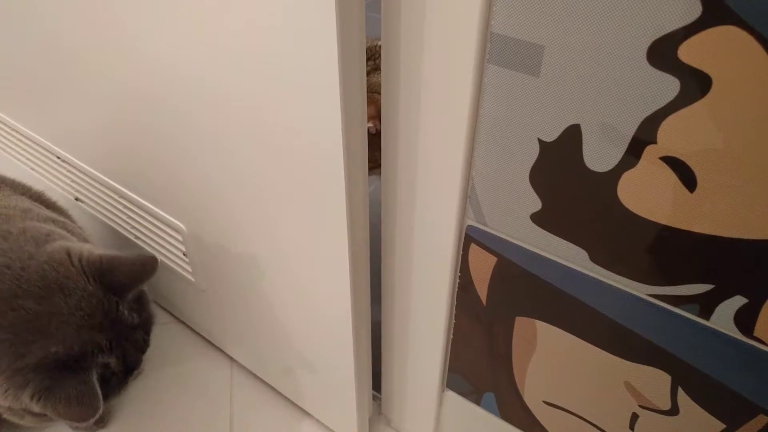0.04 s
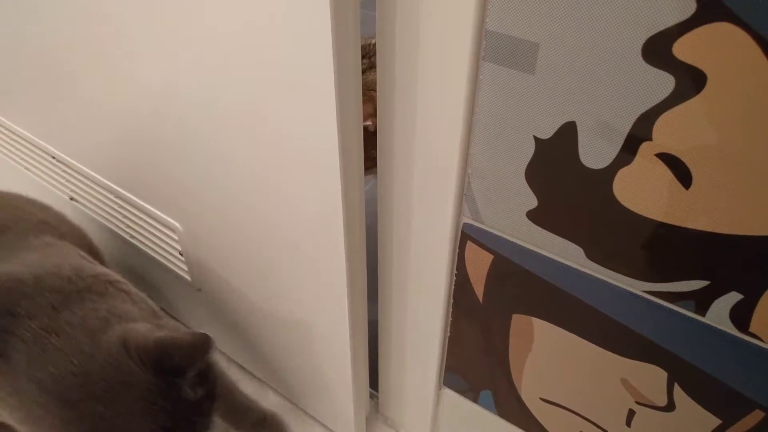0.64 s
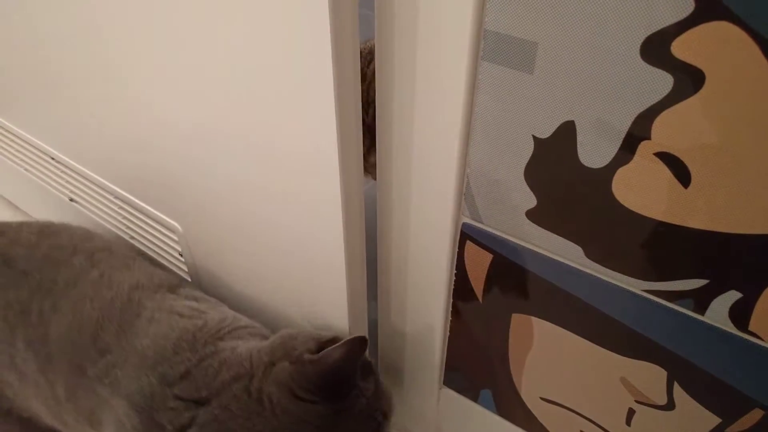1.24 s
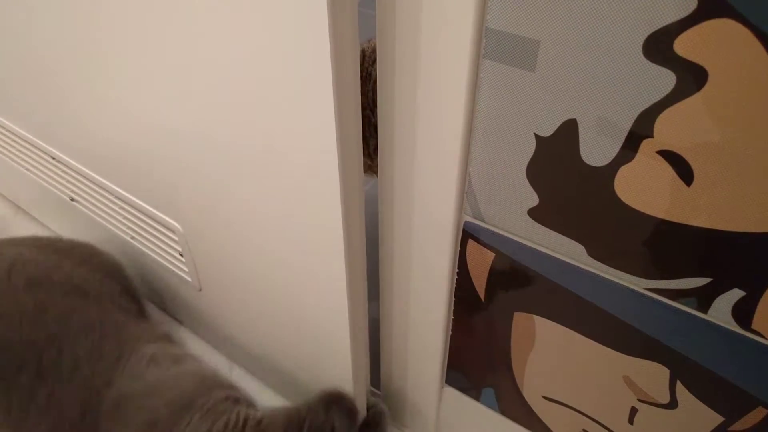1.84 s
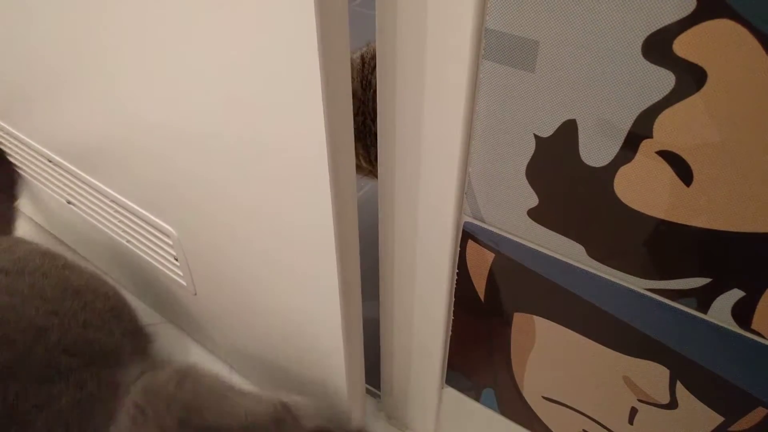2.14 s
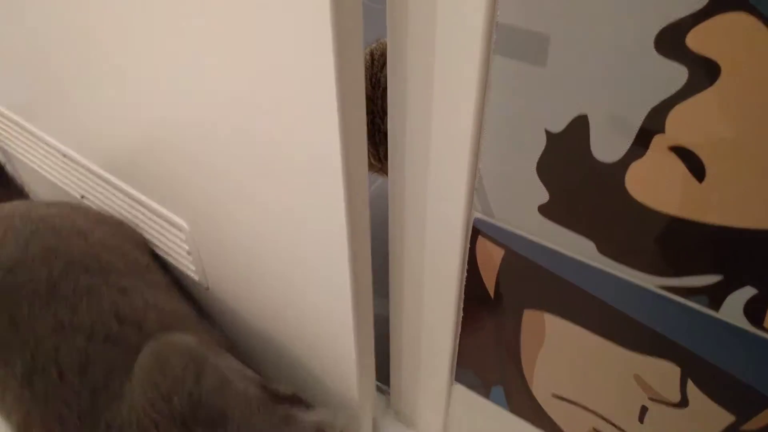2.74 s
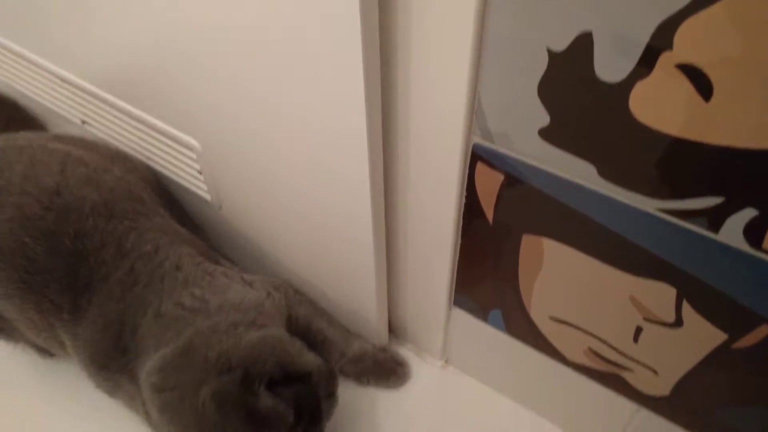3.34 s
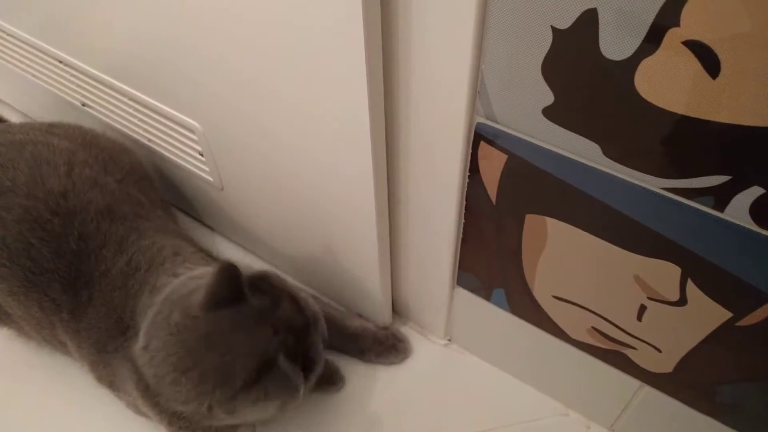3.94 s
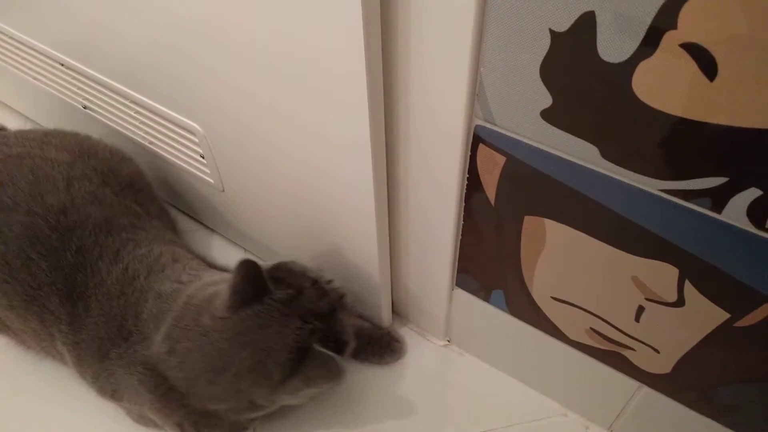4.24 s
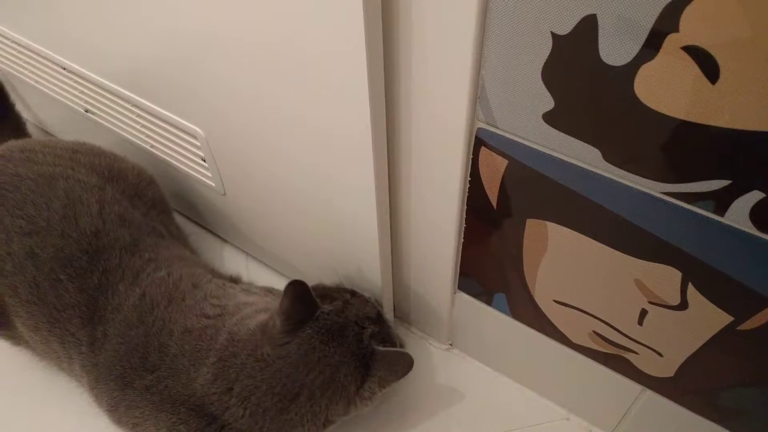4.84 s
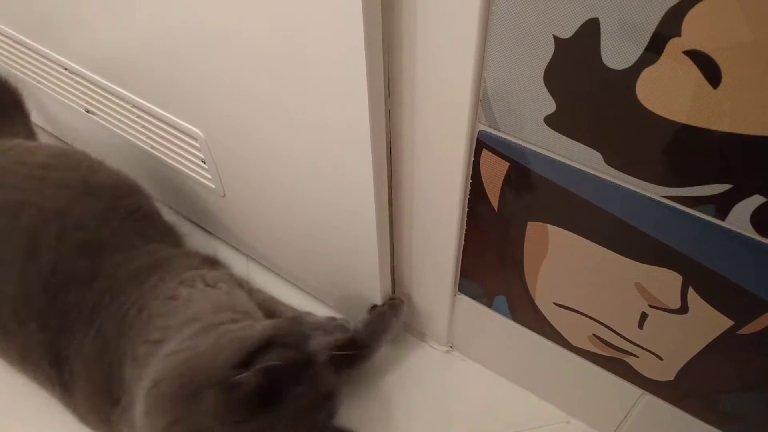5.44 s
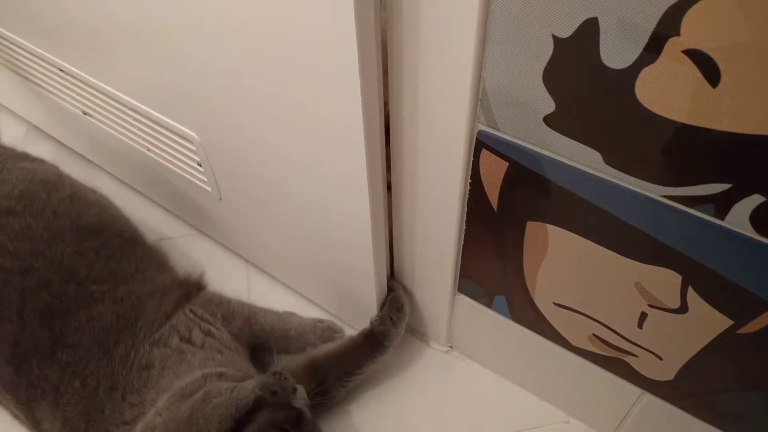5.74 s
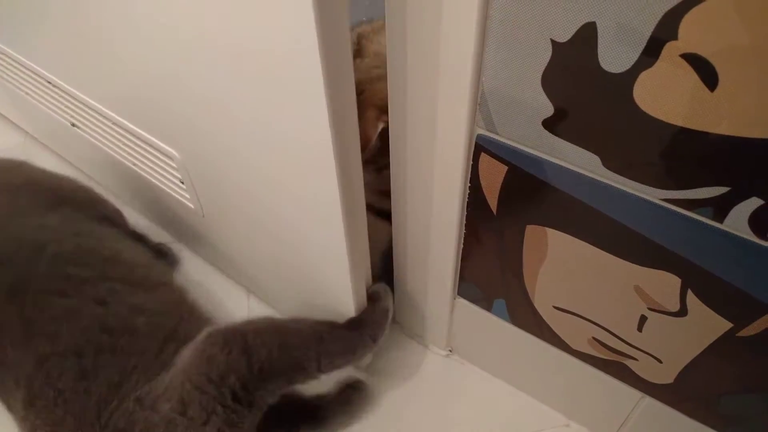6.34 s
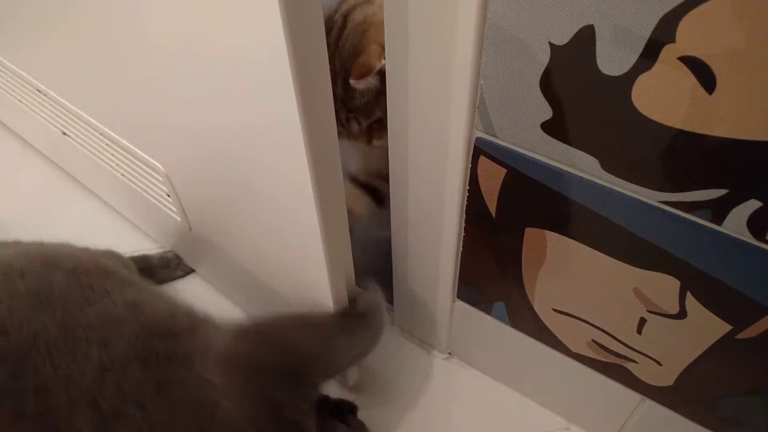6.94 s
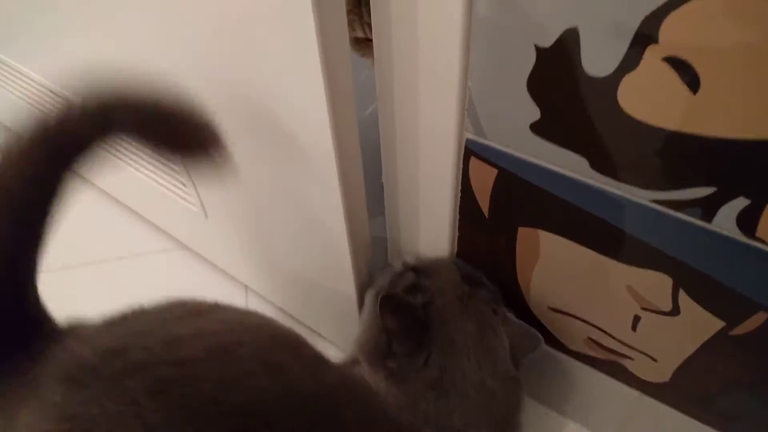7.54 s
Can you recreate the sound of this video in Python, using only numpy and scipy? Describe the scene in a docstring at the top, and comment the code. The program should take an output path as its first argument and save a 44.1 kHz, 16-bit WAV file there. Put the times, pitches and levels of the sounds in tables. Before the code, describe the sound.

A cat's fur and paws brush faintly against a light door and the floor, with a few tiny clicks and soft bumps. Fingers tap briefly on the microphone. After a lull the cat works harder: claws catch and snap off the door edge, the panel booms and clatters, and the door frame takes a few dry knocks. The hand-held microphone is close, in a small tiled room with a faint electrical hum.

```python
"""Faint brushing comes first: a cat's fur and pads rub a light door and the floor as it paws at the gap.
From about 5 s it works harder: claws catch on the edge and snap off, the panel booms and clatters,
and the frame takes a few knocks. Small tiled room, hand-held phone microphone close to the door.
Fingers tap the phone's case now and then; a faint mains hum and room air lie under it all."""
import sys
import numpy as np
from scipy import signal
from scipy.fft import rfft, irfft
from scipy.io import wavfile
from scipy.ndimage import uniform_filter1d

SR = 44100
rng = np.random.default_rng(int(sys.argv[2]) if len(sys.argv) > 2 else 0)


def transcribe(u):
    """Save the signal u as a 16-bit wav file named by the first command-line argument.

    u: samples, shape (n,) or (channels, n), limited to [-1, 1]; the rate is SR.
    q: integer samples, one column per channel.
    """
    v = np.clip(np.atleast_2d(u).T, -1, 1)
    q = np.round(v * 32767).astype(np.int16)
    wavfile.write(sys.argv[1], SR, q)


N = 339300
T = np.arange(N) / SR

# spectrum of rubbed or rattled wood: f/Hz, relative level/dB
WOOD_SPECTRUM = [(60, -8.5), (200, -0.5), (400, 1.5), (900, 1), (1900, 4.5), (4000, -12.5), (16000, -107)]


def undb(db):
    """Decibels to gain."""
    return 10 ** (np.asarray(db) / 20)


def unit(x):
    """Scale to rms 1."""
    return x / np.sqrt(np.mean(x ** 2))


def add(out, s, x):
    """Mix x into out from time s."""
    i = max(int(s * SR), 0)
    out[i:i + len(x)] += x[:max(N - i, 0)]


def colour(x, points):
    """Minimum-phase filter following an outline of f/Hz, level/dB."""
    size = 4096
    hz, db = np.transpose(points)
    bin_hz = np.arange(size // 2 + 1) * SR / size
    log_gain = np.interp(np.log(bin_hz + 1), np.log(hz), np.log(undb(db)))
    cepstrum = irfft(log_gain)[:size // 2]
    cepstrum[1:] *= 2
    return signal.fftconvolve(x, irfft(np.exp(rfft(cepstrum, size))))[:len(x)]


def resonate(x, hz, q):
    """One resonance, gain 1 at its centre."""
    return signal.lfilter(*signal.iirpeak(min(hz, SR / 3), max(q, 1), fs=SR), x)


def decay(t, t60):
    """Envelope that falls 60 dB in t60 seconds."""
    return np.exp(-np.log(1000) * t / t60)


def wander(rate_hz):
    """Random drift with a spread near 1."""
    knots = rng.standard_normal(N // 20)
    return np.interp(T * rate_hz, np.arange(len(knots)), knots)


def claws(slip_s=0.0013, second_slip=0.24, release=1.6, clean_hz=11900, skidding_hz=8450):
    """A claw lets go with a jerk and skids in two quick slips; returns direct sound and room feed."""
    # claws leaving the edge: t/s, level/dB, ring f/Hz, skid/s, room feed relative to the snap/dB
    releases = [(1.609, -50, 7000, .002, -10), (1.699, -50, 6770, 0.0086, -5.5),
                (5.334, -47.5, 4800, .002, 3), (5.5217, -32.5, 7800, 0.0014, -7),
                (5.527, -39, 4100, 0.013, -6.5), (5.6494, -17, 7550, 0.001, -7.5),
                (5.914, -43.5, 5450, .012, -1), (6.021, -45, 4200, 0.00098, -3),
                (6.298, -22, 4120, .0019, -11), (6.3062, -30.5, 4070, 0.0035, -21),
                (6.570, -22.5, 5700, .003, -3), (6.6977, -33, 3200, 0.0017, -20),
                (6.8906, -30, 5370, 0.0019, 1), (6.909, -40, 3140, 0.01, -10),
                (6.966, -30.5, 3500, 0.0014, -19), (7.225, -39, 3540, 0.0017, -28),
                (7.384, -43.5, 8100, .0016, -9)]
    direct, spill = np.zeros(N), np.zeros(N)
    t = T[:SR // 10]
    jerk = signal.unit_impulse(len(t))
    for s, db, hz, skid_s, room_db in releases:
        drag = skid_s / 0.0019  # above 1 the snap is duller and rings more on one resonance
        ring_db = np.log2(drag) - 1
        top_hz = skidding_hz + (clean_hz - skidding_hz) / (1 + drag ** 6)
        skid = np.exp(-t / skid_s) + second_slip * (t > slip_s) * np.exp(-abs(t - slip_s) / skid_s)
        force = release * jerk + skid * rng.standard_normal(len(t))
        snap = door_edge(force, hz, ring_db, top_hz)
        gain = undb(db) / np.sqrt(uniform_filter1d(snap ** 2, size=176).max())  # by the loudest 4 ms
        add(direct, s, gain * snap)
        # summed over all directions, the spectrum that feeds the room is smooth
        add(spill, s, gain * undb(room_db) * door_edge(jerk, hz, ring_db, top_hz))
    return direct, spill


def door_edge(force, hz, ring_db, top_hz):
    """A claw rings the edge; where it lands picks out one resonance and leaves far lower ones quiet."""
    # spectrum of a claw on the edge: f/Hz, relative level/dB
    claw_spectrum = [(200, -11), (1150, -15), (1800, -1), (2400, -4), (3200, -4.5), (5500, -3.5),
                     (7500, -3.5), (9500, -7.5), (12000, -5), (16000, -4)]
    # resonances of the edge: f/Hz, width/Hz, relative level/dB
    edge_modes = [(1940, 220, -5), (3250, 340, -1.5), (4160, 520, -5), (6100, 860, -12), (6700, 260, 1.5),
                  (7420, 220, 1), (12000, 760, -11)]
    low_hz = 0.42 * hz
    contact_band = [(low_hz * 2 ** -.5, -16), (low_hz, 0), (top_hz, 0), (top_hz * 2 ** .5, -13)]
    crack = colour(colour(force, claw_spectrum), contact_band)
    crack = crack + sum(undb(db) * resonate(crack, f, f / width) for f, width, db in edge_modes)
    return unit(unit(crack) + undb(ring_db) * unit(resonate(crack, hz, q=3.3)))


def door_panel(clatter_hz=1500, clatter_rise_s=0.0042, clatter_fade_s=0.02, linger_s=0.11, ring_db=-6):
    """A soft push sets the low modes booming; the edge chatters under the paw and rings higher ones."""
    # shoves on the door: t/s, boom peak/dB, push f/Hz, clatter level/dB
    shoves = [(1.914, -51.5, 71.5, -68), (2.97, -51.5, 65, -82), (5.388, -42, 86, -60),
              (5.463, -51, 75, -62.5), (5.535, -26, 95, -43.5), (5.609, -39.5, 130, -63.5),
              (5.763, -60, 113, -53.5), (6.12, -51, 66, -74), (6.30, -34.5, 78, -51),
              (6.411, -38.5, 72, -69), (6.584, -43.5, 83, -43.5), (6.794, -36.5, 112, -81),
              (7.029, -46, 71, -68), (7.355, -45, 76.5, -66), (7.486, -54, 64, -72), (7.56, -57, 81, -57)]
    # modes of the panel: f/Hz, relative level/dB, t60/s
    panel_modes = [(68.17, 7.5, 0.78), (113.3, 10.5, 0.63), (182.5, -15.5, 0.31), (221.4, -11, 0.28),
                   (307, -27, 0.2), (401, -10, 0.42), (606, -22.5, 0.46), (784, -18, 0.32),
                   (940, -22, 0.13), (1140, -33, 0.16), (1356, -2, 0.03)]
    out, t = np.zeros(N), T[:SR]
    modes = [undb(db) * np.sin(2 * np.pi * hz * t) * decay(t, t60) for hz, db, t60 in panel_modes]
    panel, upper_modes = sum(modes), sum(modes[2:])
    # the chatter dies fast, its echo lingers
    fade = np.exp(-t / clatter_fade_s) + 0.23 * np.exp(-t / linger_s)
    for s, boom_db, push_hz, clatter_db in shoves:
        cycles = t * push_hz
        push = np.sin(2 * np.pi * cycles) * cycles * np.exp(-cycles / 0.42)
        boom = signal.fftconvolve(push, panel)[:len(t)]
        add(out, s, undb(boom_db) * boom / abs(boom).max())
        # harder chatter builds faster and is brighter: an octave for every 13 dB above -53 dB
        cut_hz = min(clatter_hz * 2 ** ((clatter_db + 53) / 13), SR / 3)
        rise_s = clatter_rise_s * (clatter_hz / cut_hz) ** 2
        chatter = rng.standard_normal(len(t)) * fade * (1 - np.exp(-t / rise_s))
        ring = unit(signal.fftconvolve(chatter, upper_modes)[:len(t)])
        clatter = unit(colour(chatter, WOOD_SPECTRUM)) + undb(ring_db) * ring
        clatter = signal.sosfilt(signal.butter(2, cut_hz, fs=SR, output="sos"), clatter)
        add(out, s, undb(clatter_db) * clatter / clatter[:SR // 25].std())
    return out


def door_frame(crack_s=0.0021):
    """Paw or body bumps the frame: a short, dry wooden knock."""
    # bumps on the frame: t/s, peak level/dB
    bumps = [(5.539, -30), (7.226, -41), (7.5641, -32.5), (7.566, -30)]
    # modes of the frame: f/Hz, relative level/dB, t60/s
    frame_modes = [(462, 0.5, 0.038), (690, 4.5, 0.015), (1000, 4, 0.013), (1500, -8, 0.018),
                   (2170, -19, 0.0071), (3400, 7, 0.0063), (3970, -1, 0.014)]
    out, t = np.zeros(N), T[:SR // 5]
    ring = sum(undb(db) * np.sin(2 * np.pi * hz * t) * decay(t, t60) for hz, db, t60 in frame_modes)
    for s, db in bumps:
        crack = colour(rng.standard_normal(len(t)) * np.exp(-t / crack_s), WOOD_SPECTRUM)
        knock = unit(ring) + 0.35 * unit(crack)
        add(out, s, undb(db) * knock / abs(knock).max())
    return out


def friction(grain_db, flurry_db, snags_per_s=60, snag_gain=5.6):
    """Countless hairs slip in flurries of tiny clicks, with a claw tip snagging here and there."""
    hairs = unit(rng.standard_normal(N) * undb(grain_db * wander(1500) + flurry_db * wander(90)))
    snags = (rng.random(N) < snags_per_s / SR) * rng.standard_normal(N)
    return unit(hairs + snag_gain * snags)


def paw_strokes(rise_share=0.38, wood_db=-12, firm_hz=6000):
    """Each stroke swells, then fades as the pad lifts; a firm, low-pitched one also stirs the wood."""
    # strokes over door and floor: peak t/s, level/dB, length/s, emphasised f/Hz
    strokes = [(1.284, -64, 0.065, 9500), (1.399, -59.5, 0.022, 6600), (1.497, -59, .04, 6950),
               (1.746, -56, 0.044, 6860), (1.868, -55.5, 0.096, 6740), (1.98, -55.5, 0.042, 6250),
               (2.225, -64.5, 0.12, 6000), (2.353, -55, .028, 7640), (2.485, -61.5, 0.072, 7200),
               (2.667, -60.5, 0.048, 7850), (2.978, -53.5, .011, 9200), (3.039, -52.5, 0.12, 9500),
               (3.241, -54, 0.027, 7540), (3.486, -58.5, 0.026, 5870), (5.233, -51.5, 0.068, 7400),
               (5.36, -50, 0.036, 5640), (5.449, -47.5, 0.02, 4030), (5.531, -41.5, 0.027, 6560),
               (5.678, -46, 0.017, 11500), (5.753, -41.5, 0.026, 5560), (5.832, -50.5, 0.04, 5200),
               (6.045, -45.5, .022, 7850), (6.106, -51, 0.053, 7650), (6.175, -50.5, 0.034, 6500),
               (6.35, -46.5, 0.089, 6600), (6.463, -48.5, 0.038, 6430), (6.725, -48, 0.02, 8950),
               (6.83, -51.5, 0.11, 6530), (6.987, -46, 0.084, 6200), (7.221, -51, 0.063, 10250),
               (7.269, -37.5, 0.054, 7900), (7.29, -44.5, 0.022, 3660), (7.458, -53, .04, 7100),
               (7.659, -47, 0.062, 7600)]
    # spectrum of pad and fur rubbing: f/Hz, relative level/dB
    paw_spectrum = [(300, -13.5), (1900, -25.5), (3000, -10.5), (5300, -7.5), (6900, -3), (8500, -9),
                    (12000, -9.5), (16000, -13.5)]
    grain = friction(grain_db=0.0, flurry_db=1.5, snags_per_s=90, snag_gain=8.2)
    out, rub = np.zeros(N), colour(grain, paw_spectrum)
    wood = unit(resonate(colour(grain, WOOD_SPECTRUM), hz=1400, q=1.0))
    for s, db, length_s, hz in strokes:
        rise_s, fall_s = rise_share * length_s, (1 - rise_share) * length_s
        near = abs(T - s) < .4
        t = T[near] - s
        speed = np.where(t < 0, np.exp(-.5 * (t / rise_s) ** 2), np.exp(-(abs(t) / fall_s) ** 2.4))
        hiss = unit(0.47 * unit(rub[near]) + unit(resonate(rub[near], hz, q=1.52)))
        firmness = 1 / (1 + (hz / firm_hz) ** 8)
        out[near] += undb(db) * speed * (hiss + firmness * undb(wood_db) * wood[near])
    return out


def pad_thumps(band_hz=(120, 380)):
    """A furry pad lands on floor or door with a short, dull thump."""
    # pads landing: t/s, peak level/dB, ring f/Hz, fade/s
    landings = [(.254, -52, 215, 0.0028), (1.902, -49, 217, 0.0028), (2.741, -52, 179, 0.0019),
                (5.559, -38.5, 221, 0.016), (6.346, -40.5, 201, 0.011), (6.806, -40, 147, 0.011),
                (6.816, -46, 281, 0.0095), (7.29, -45.5, 173, 0.0078)]
    out, t = np.zeros(N), T[:SR // 10]
    dull = signal.butter(3, band_hz, "band", fs=SR, output="sos")
    for s, db, hz, fade_s in landings:
        squash = unit(signal.sosfilt(dull, rng.standard_normal(len(t))))
        thump = (np.sin(2 * np.pi * hz * t) + 0.59 * squash) * t * np.exp(-t / fade_s)
        add(out, s, undb(db) * thump / abs(thump).max())
    return out


def flank_rub(trim_db=-2):
    """The cat's flank brushes door and floor all the while."""
    # course of the body's sliding: t/s, level before trim/dB
    slide_levels = [(0.0, -73), (0.47, -76), (1.18, -71.5), (1.71, -66.5), (1.84, -61.5), (2.7, -64.5),
                    (3.08, -59.5), (3.7, -71), (5.23, -74), (5.4, -57.5), (5.7, -57), (6.15, -62),
                    (6.45, -53.5), (6.85, -56.5), (7.0, -65), (7.22, -60), (7.43, -62), (7.69, -50)]
    # spectrum of sliding fur: f/Hz, relative level/dB
    fur_spectrum = [(300, -5), (1500, -13.5), (2900, -19), (4000, -10.5), (5300, -11.5), (6700, -5),
                    (8000, -9.5), (9500, -12), (11500, -13.5), (16000, -17.5)]
    rub = colour(friction(grain_db=-3.5, flurry_db=2.0), fur_spectrum)
    sheen = 0.63 * resonate(rub, hz=5400, q=2.3)
    return unit(rub + sheen) * undb(trim_db + np.interp(T, *np.transpose(slide_levels)))


def handling(tick_db=-22, scuff_s=0.0028, thud_lag_s=0.0328, thud_s=0.018):
    """Fingers on the case, right at the microphone: dead knocks; a shifting grip scuffs, then thuds."""
    # finger taps: t/s, peak level/dB, ring f/Hz, fade/s
    taps = [(2.7048, -40, 800, 0.00012), (3.312, -37, 200, 0.00079), (3.442, -40.5, 467, 0.00091),
            (3.681, -39, 185, 0.0028), (3.6885, -37.5, 600, 0.00027), (3.724, -36.5, 450, 0.0014),
            (3.757, -27.5, 565, 0.00086), (3.762, -37, 584, 0.00069), (4.4496, -36.5, 714, 0.00011),
            (7.429, -46.5, 804, 0.00035)]
    # shifts of grip: t/s, scuff level/dB, thud peak/dB, thud f/Hz
    grips = [(3.31, -46, -36.5, 58), (3.680, -46, -35, 61.4)]
    out, t = np.zeros(N), T[:SR // 20]
    for s, db, hz, fade_s in taps:
        ring = np.sin(2 * np.pi * hz * t) + 0.071 * np.sin(np.pi * hz * t)  # with the octave below
        tick = unit(resonate(rng.standard_normal(len(t)), hz=2000, q=1.2))
        knock = (ring + undb(tick_db) * tick) * np.sqrt(t) * np.exp(-t / fade_s)
        add(out, s, undb(db) * knock / abs(knock).max())
    for s, scuff_db, thud_db, hz in grips:
        skin = rng.standard_normal(len(t))
        scuff = unit(resonate(skin, hz=6500, q=2.8) + 0.37 * resonate(skin, hz=2500, q=1.0))
        add(out, s, undb(scuff_db) * scuff * t / scuff_s * np.exp(1 - t / scuff_s))
        since = T - s - thud_lag_s
        out -= undb(thud_db) * np.cos(2 * np.pi * hz * since) * np.exp(-(since / thud_s) ** 2)
    return out


def squeaks(jitter=0.05):
    """Two faint, thin squeaks, one gliding down and one up."""
    # pitch glides: t/s, length/s, start f/Hz, end f/Hz, peak level/dB
    glides = [(4.73, .12, 2400, 1800, -74), (5.17, .08, 2350, 3200, -72)]
    out = np.zeros(N)
    for s, length_s, start_hz, end_hz, db in glides:
        hz = np.linspace(start_hz, end_hz, int(length_s * SR))
        hz *= 1 + jitter * wander(900)[:len(hz)]
        add(out, s, undb(db) * np.hanning(len(hz)) * np.sin(2 * np.pi * np.cumsum(hz) / SR))
    return out


def tiled_room(x, t60_low_s=0.38, t60_high_s=0.2, split_hz=7000, grain_db=4.0):
    """Close tiled walls: early echoes, the bulk after some 16 ms, then a decay, treble going first."""
    t = T[:SR * 2 // 3]
    echoes = rng.standard_normal(len(t)) * undb(grain_db * rng.standard_normal(len(t)))
    low = signal.sosfilt(signal.butter(1, split_hz, fs=SR, output="sos"), echoes)
    tail = low * decay(t, t60_low_s) + (echoes - low) * decay(t, t60_high_s)
    early, bulk = .7 * (t > .002), 1 / (1 + np.exp((.016 - t) / .002))
    tail *= early + bulk
    return signal.fftconvolve(x, 0.98 * tail / np.linalg.norm(tail))[:N]


def room_tone(hum_hz=100.6, hum_db=-62.5, waver_db=0.23, air_db=-66.5):
    """A slightly wavering mains hum over still room air."""
    # spectrum of the room's air: f/Hz, relative level/dB
    air_spectrum = [(20, -29), (40, -13.5), (65, -4.5), (100, -9.5), (180, -12.5), (260, -17), (500, -20),
                    (950, -23.5), (2000, -29), (3000, -32.5), (7000, -39), (16000, -35)]
    hum = unit(np.sin(2 * np.pi * hum_hz * T)) * undb(hum_db + waver_db * wander(2.0))
    return hum + unit(colour(rng.standard_normal(N), air_spectrum)) * undb(air_db)


def scene():
    """Mono, close to the door: claws, rubbing and knocks echo off the tiles; panel and fingers do not."""
    snaps, spill = claws()
    rubbing = paw_strokes() + flank_rub() + squeaks()
    knocks = door_frame() + pad_thumps()
    echo = tiled_room(spill + undb(-9.5) * rubbing + undb(-5.5) * knocks)
    return (snaps + rubbing + door_panel() + knocks + echo + handling() + room_tone())[None]


def record(dry, low_cut_hz=25, top_hz=16000, offset=-0.0008):
    """The phone drops the deepest rumble, cuts the top and sits on a tiny DC offset."""
    x = signal.sosfilt(signal.butter(2, low_cut_hz, "high", fs=SR, output="sos"), dry)
    return signal.sosfilt(signal.ellip(10, .2, 70, top_hz, fs=SR, output="sos"), x) + offset


dry = scene()
out = record(dry)
transcribe(out)
```